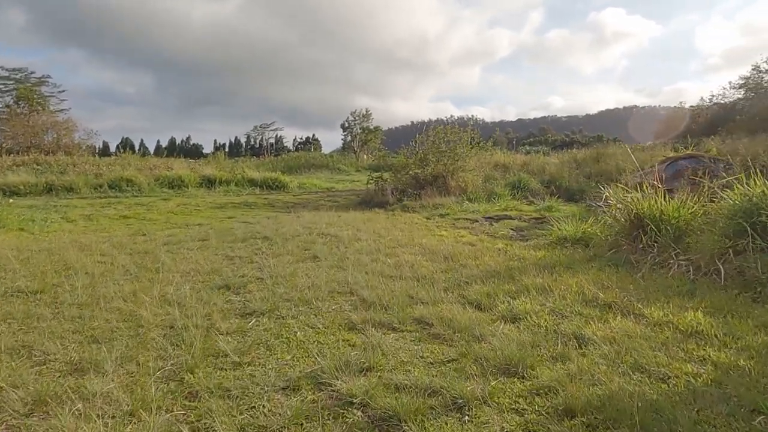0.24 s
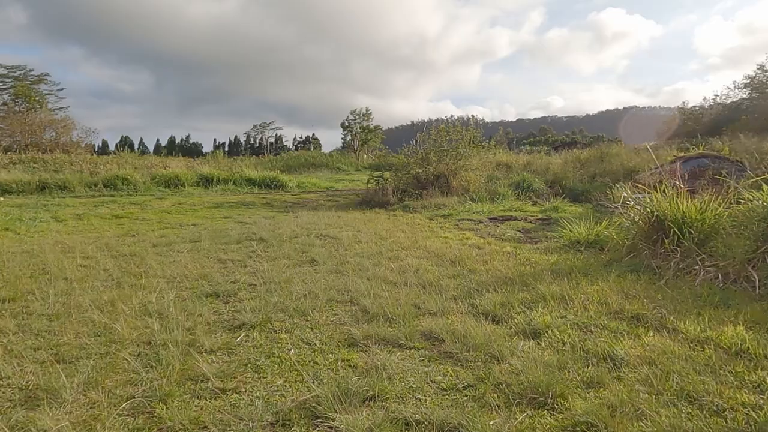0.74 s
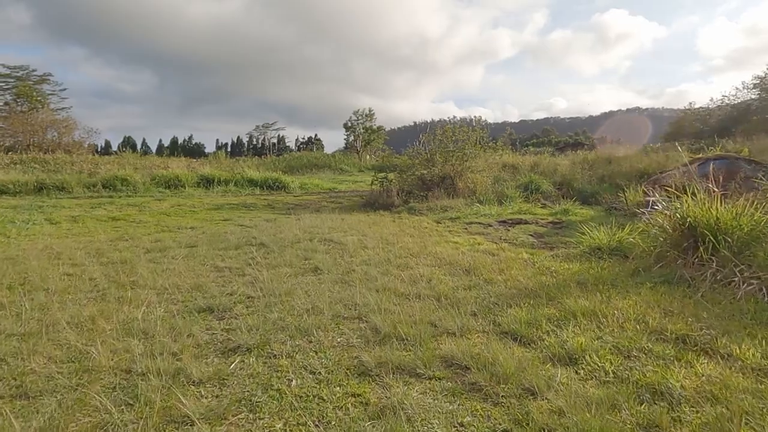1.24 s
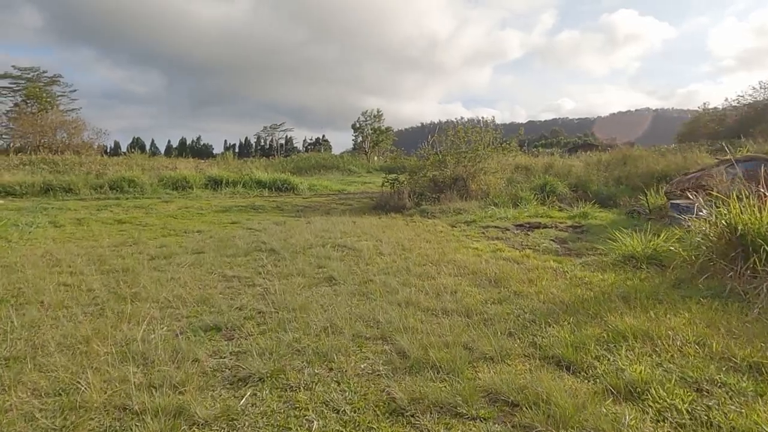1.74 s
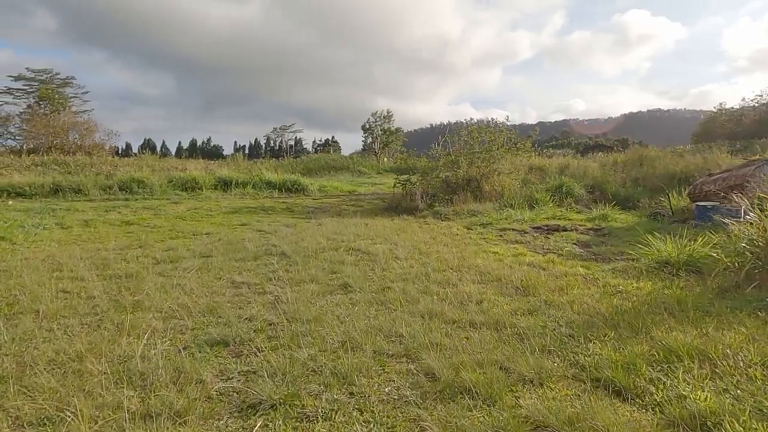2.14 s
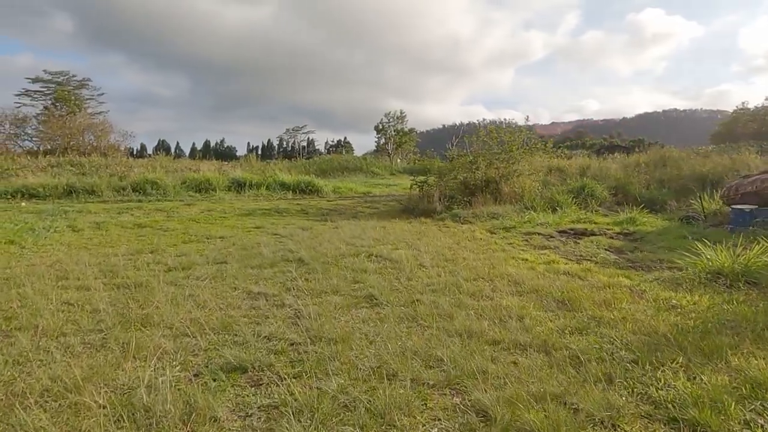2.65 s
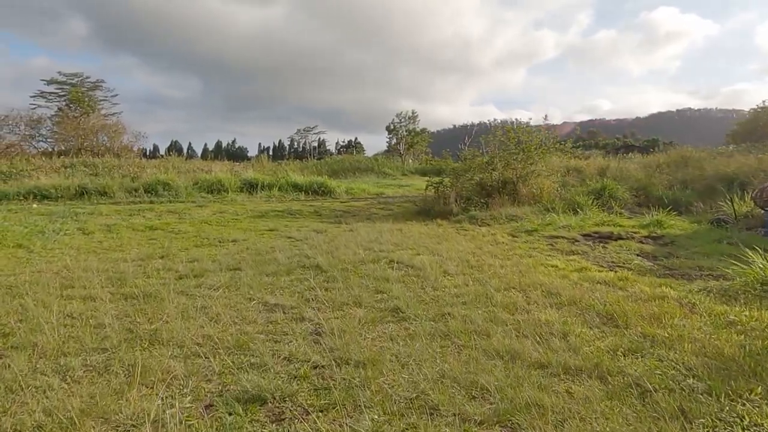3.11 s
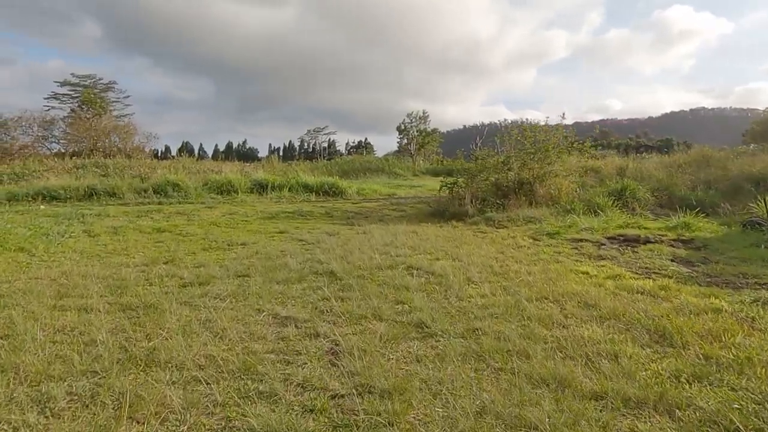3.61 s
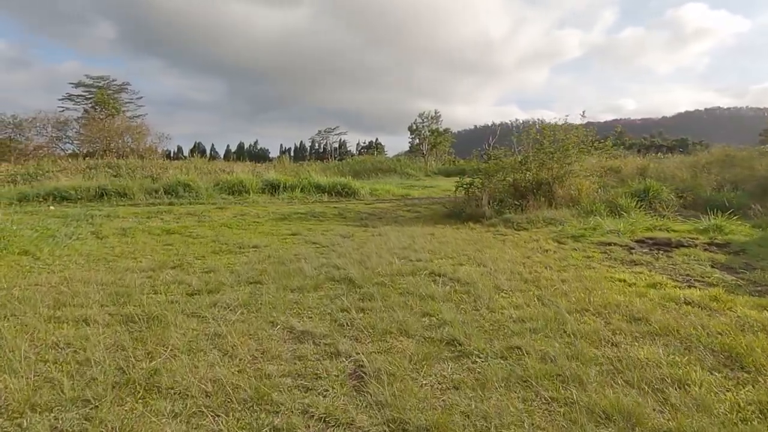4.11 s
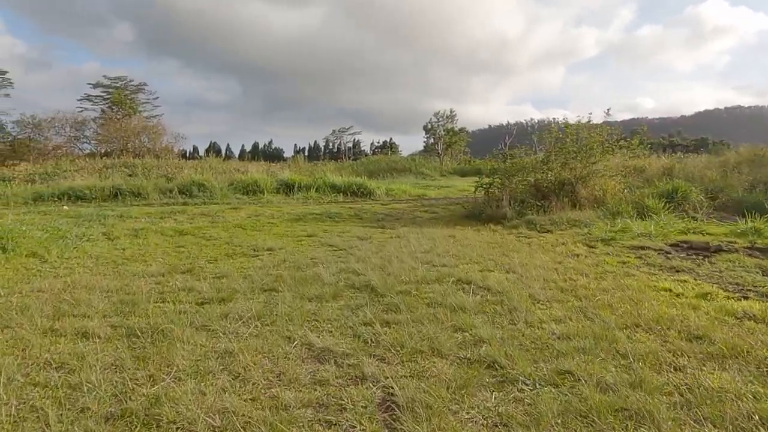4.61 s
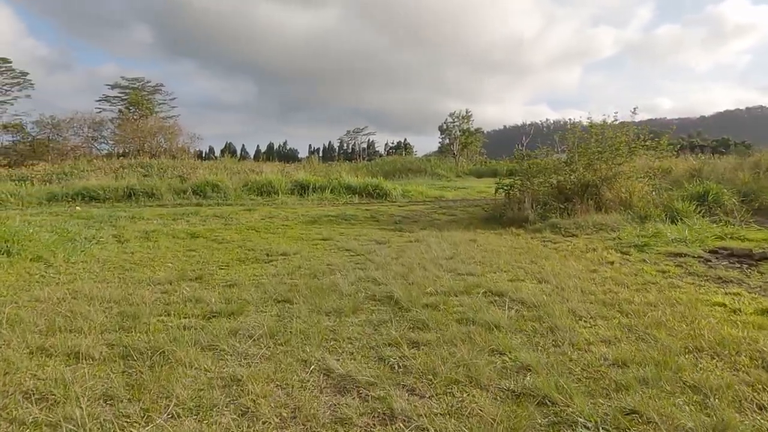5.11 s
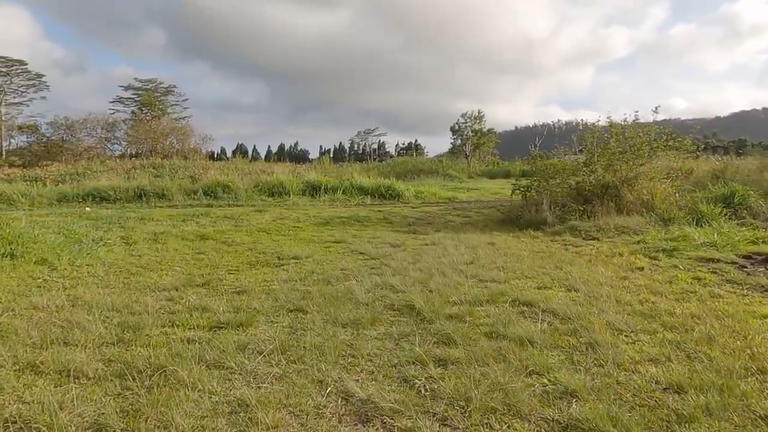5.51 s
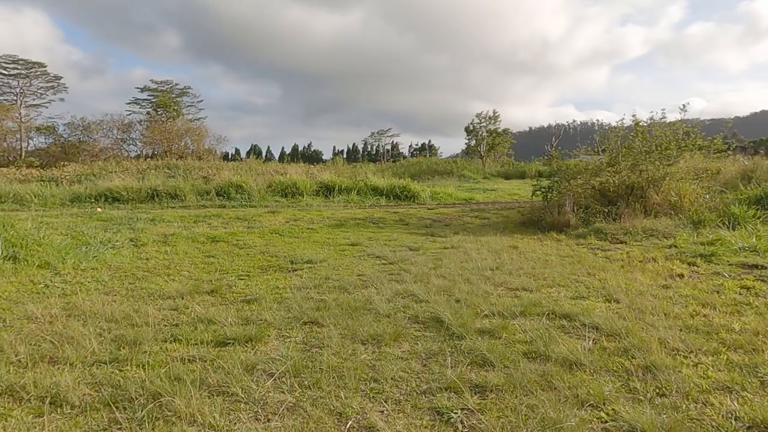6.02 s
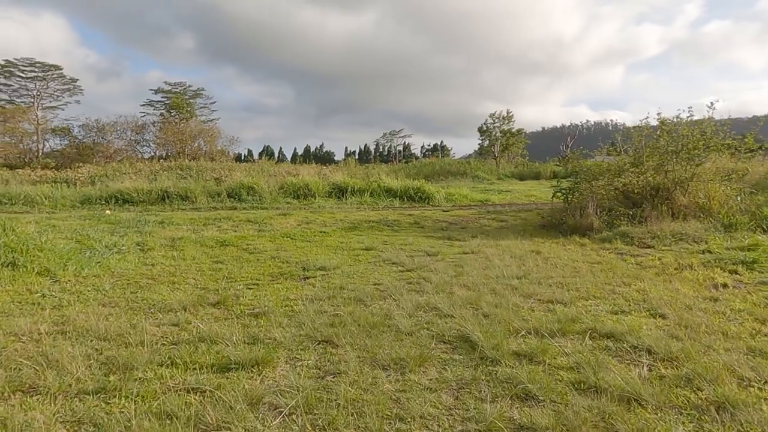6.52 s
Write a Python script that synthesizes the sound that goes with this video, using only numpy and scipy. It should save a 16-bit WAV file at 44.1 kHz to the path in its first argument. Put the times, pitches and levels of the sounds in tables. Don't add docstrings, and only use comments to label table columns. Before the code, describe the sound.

Footsteps brush crackling grass in an open field, with overlapping bird whistles and chips, ringing cricket trills and a faint distant rumble.

```python
import sys
import numpy as np
from scipy import signal
from scipy.fft import rfft, irfft, next_fast_len
from scipy.io import wavfile
from scipy.ndimage import uniform_filter1d, map_coordinates

SR = 44100
rng = np.random.default_rng(int(sys.argv[2]) if len(sys.argv) > 2 else 0)


def wav_out(sig):
    wavfile.write(sys.argv[1], SR, np.round(np.clip(np.atleast_2d(sig).T, -1, 1) * 32767).astype(np.int16))


def field_ratio(decibels):
    return 10 ** (np.asarray(decibels, dtype=float) / 20)


N = 297675
T = np.arange(N) / SR


def unit(x):
    return x / np.sqrt(np.mean(x ** 2) + 1e-20)


def along(points, hz):
    f, v = np.transpose(points)
    return np.interp(np.log(hz + 1), np.log(f + 1), v)


def wobble(knots_per_s):
    knots = rng.standard_normal(int(N * knots_per_s / SR) + 4)
    return map_coordinates(knots, [T * knots_per_s])


def filtered(x, response):
    m = next_fast_len(N + SR // 10)
    spectrum = rfft(x, m) * response(np.fft.rfftfreq(m, 1 / SR))
    return irfft(spectrum, m)[..., :N]


def panned(x, left_minus_right_db):
    return x * field_ratio([[left_minus_right_db / 2], [-left_minus_right_db / 2]])


# f/Hz, correlation [-1..1]
CORRELATION = [(60, 0.9), (200, 0.78), (600, 0.57), (1400, 0.88), (3000, 0.82), (6000, 0.9), (9000, 0.3),
               (13000, 0)]
# f/Hz, left minus right/dB
BALANCE = [(110, -6.5), (380, -5), (1290, 4.5), (4400, 1), (8120, 5), (15000, 11.5)]


def spread(pair, spectrum, band_hz):
    hz = np.fft.rfftfreq(N, 1 / SR)
    turn = np.arccos(np.clip(along(CORRELATION, hz), -1, 1)) / 2
    mid, side = rfft(pair) * field_ratio(along(spectrum, hz)) * [np.cos(turn), np.sin(turn)]
    in_band = (hz > band_hz[0]) & (hz < band_hz[1])
    band_rms = np.sqrt(2 * np.sum(abs(mid[in_band]) ** 2)) / N
    stereo = np.array([mid + side, mid - side])
    return irfft(stereo * field_ratio(along(BALANCE, hz) * [[.5], [-.5]]), N) / band_rms


def open_air(x, t60_s):
    t = T[:SR // 2]
    tail = rng.standard_normal((2, len(t))) * field_ratio(-60 * t / t60_s) * (t > .004)
    return signal.fftconvolve(x, tail / np.linalg.norm(tail[0]), axes=1)[:, :N]


# f/Hz, density/(dB per Hz)
RUMBLE_SPECTRUM = [(60, -8.5), (100, -93), (135, -0.5), (200, 1), (400, -13), (560, -14), (900, -35.5)]
# f/Hz, density/(dB per Hz)
INSECT_SPECTRUM = [(400, -18), (850, -14), (1100, -4.5), (1630, 8), (3120, 0), (5460, 2.5), (8490, -33),
                   (12300, -60), (14500, -41), (15500, -42)]
RUMBLE_DB, INSECTS_DB = -66.5, -62.5


def field():
    rumble = spread(rng.standard_normal((2, N)), RUMBLE_SPECTRUM, band_hz=(150, 450))
    rumble = rumble * field_ratio(1.5 * wobble(6))
    insects = spread(rng.standard_normal((2, N)), INSECT_SPECTRUM, band_hz=(1000, 5000))
    return field_ratio(RUMBLE_DB) * rumble + field_ratio(INSECTS_DB) * insects


# t/s, f/Hz, level/dB
FIRST_STROPHE = [
    [(0.0, 2060, -52), (0.09, 2296, -56), (0.108, 2520, -54), (0.158, 2630, -50), (0.21, 2730, -57)],
    [(0.28, 2690, -58), (0.32, 2600, -51), (0.37, 2480, -52), (0.44, 2620, -57)],
    [(0.48, 3280, -57), (0.57, 3040, -53), (0.615, 3580, -56), (0.66, 3350, -60)],
    [(0.73, 1760, -56), (0.84, 2080, -54), (0.915, 2480, -52), (0.985, 2610, -47), (1.06, 2700, -53),
     (1.09, 2700, -61), (1.17, 2600, -62)],
    [(1.195, 2580, -51), (1.25, 2350, -56), (1.29, 2370, -53), (1.33, 2550, -51), (1.35, 2540, -52)],
    [(1.4, 3230, -55), (1.44, 3180, -48), (1.5, 2940, -52), (1.55, 3190, -53), (1.62, 3450, -57),
     (1.67, 3540, -57), (1.73, 3490, -64)],
    [(1.66, 1743, -58), (1.784, 2016, -56), (1.846, 2364, -54), (1.908, 2590, -47), (1.97, 2680, -44)],
    [(2.49, 2010, -55), (2.56, 1820, -55), (2.595, 1950, -55), (2.625, 2560, -55), (2.68, 2720, -55),
     (2.74, 2750, -58)],
    [(2.805, 2510, -51), (2.85, 2700, -43), (2.9, 2800, -47), (2.945, 2880, -49), (2.99, 2880, -58)],
    [(2.84, 1990, -54), (2.89, 1780, -54), (2.92, 1890, -54), (2.945, 2490, -55), (3.0, 2710, -54),
     (3.05, 2810, -51), (3.1, 2730, -61)],
    [(3.11, 1930, -59), (3.15, 1950, -55), (3.19, 1870, -55), (3.21, 1680, -55)],
    [(3.35, 2880, -50), (3.38, 2990, -50), (3.42, 3070, -55), (3.44, 3270, -58)],
]
# t/s, f/Hz, level/dB
SECOND_STROPHE = [
    [(3.54, 3750, -53), (3.56, 3850, -54), (3.6, 3760, -59), (3.62, 3720, -53), (3.645, 3350, -51),
     (3.71, 3090, -46)],
    [(3.65, 2020, -53), (3.688, 2010, -51), (3.725, 1800, -56), (3.79, 1690, -59)],
    [(3.92, 2260, -62), (4.0, 2210, -55), (4.074, 2180, -51), (4.18, 2130, -62)],
    [(4.34, 2580, -56), (4.4, 2670, -55), (4.46, 2710, -55), (4.52, 2630, -49), (4.64, 2550, -51)],
    [(4.89, 2420, -50), (4.93, 2400, -48), (4.96, 2190, -50), (5.0, 1880, -52)],
    [(5.145, 2460, -56), (5.2, 2330, -56), (5.25, 2580, -56), (5.3, 2580, -56), (5.35, 2820, -57),
     (5.4, 2990, -57)],
    [(5.75, 2680, -52), (5.81, 2512, -49), (5.87, 2517, -52), (5.92, 2670, -56), (5.96, 2830, -58)],
    [(5.965, 2870, -50), (5.985, 3000, -51), (6.03, 2850, -54), (6.11, 2860, -58), (6.14, 2770, -61)],
    [(6.18, 3040, -57), (6.25, 2980, -58), (6.33, 3110, -59), (6.49, 3130, -58), (6.55, 3070, -52),
     (6.59, 3420, -52), (6.615, 3940, -55)],
    [(6.18, 2400, -52), (6.22, 2610, -45), (6.27, 2476, -47), (6.315, 2057, -50), (6.36, 1790, -52)],
    [(6.51, 2110, -56), (6.543, 2584, -56), (6.56, 2860, -57)],
    [(6.54, 5290, -57), (6.567, 5150, -57), (6.593, 4560, -57), (6.62, 4080, -59)],
]
WHISTLE_PAN_DB = [-5.5, -6, -6.5, -5.5, -5, -3.5, -5.5, -1, -7.5, -4, -6, -10, -6, -4, 0, -4, -4, -6, -7,
                  -8.5, -10, -5.5, -6, -5]
# start/s, length/s, first f/Hz, last f/Hz, peak/dB
BIRD_CHIPS = [(.3, .065, 4560, 3500, -58.5), (.512, .035, 4230, 3960, -57), (.99, .035, 5300, 4900, -57),
              (1.05, .065, 4120, 4090, -51), (1.12, .06, 4100, 4080, -64), (1.18, .018, 7180, 5100, -53),
              (1.196, .045, 5100, 3730, -49.5), (1.598, .062, 5050, 3800, -54),
              (1.686, .022, 3300, 3050, -57), (1.91, .035, 4300, 3600, -57),
              (2.25, .07, 2380, 2250, -60), (2.31, .04, 3900, 3200, -62), (2.405, .03, 7160, 5160, -63),
              (2.45, .03, 4300, 3850, -58), (2.68, .04, 2250, 1900, -61), (3.268, .03, 2950, 2650, -57),
              (3.565, .05, 4560, 3950, -56), (3.83, .08, 3080, 3000, -61), (4.82, .03, 3200, 2600, -59),
              (5.12, .03, 3150, 3000, -59), (5.23, .085, 3200, 2850, -58), (5.26, .04, 2400, 2200, -59),
              (5.6, .08, 2420, 2100, -58), (5.14, .055, 2640, 2580, -56),
              (6.34, .045, 4350, 3950, -54.5), (6.403, .04, 4220, 4060, -58),
              (6.508, .03, 6570, 6000, -59),
              (.28, .04, 3370, 3520, -60), (.935, .09, 3430, 3800, -54), (1.682, .025, 3850, 3960, -61),
                (1.88, .018, 3800, 4500, -58), (2.548, .09, 4200, 4400, -55),
                (2.897, .012, 6400, 7600, -56), (3.025, .035, 3400, 3650, -59),
                (3.055, .07, 3640, 3560, -61), (3.36, .04, 2550, 2800, -56),
                (3.476, .055, 2960, 4530, -53.5), (3.871, .085, 1910, 3140, -53),
                (4.255, .025, 3200, 3270, -52), (4.92, .03, 2550, 3250, -51),
                (5.031, .022, 6800, 7800, -55), (5.85, .05, 2680, 2720, -54), (6.145, .03, 4300, 4750, -58),
                (6.28, .04, 5900, 6300, -61)]
# start/s, length/s, first f/Hz, last f/Hz, peak/dB
SOLE_SQUEAKS = [
    (2.0, .065, 1150, 1090, -54),
    (5.89, .08, 990, 1130, -53),
]
CHIP_PAN_DB, SQUEAK_PAN_DB = -2, 3
CHIP_ACCENT = 0.59
START_LOSS_DB, END_LOSS_DB = 4, 6


def notes():
    paths = FIRST_STROPHE + SECOND_STROPHE
    glides = [(*np.transpose(path), pan_db) for path, pan_db in zip(paths, WHISTLE_PAN_DB)]
    short = [(*row, CHIP_PAN_DB) for row in BIRD_CHIPS]
    short += [(*row, SQUEAK_PAN_DB) for row in SOLE_SQUEAKS]
    for start, length, first_hz, last_hz, peak_db, pan_db in short:
        times = start + length * np.array([0, CHIP_ACCENT, 1])
        pitches = (first_hz, first_hz + CHIP_ACCENT * (last_hz - first_hz), last_hz)
        levels = (peak_db - START_LOSS_DB, peak_db, peak_db - END_LOSS_DB)
        glides.append((times, pitches, levels, pan_db))
    return glides


def birds():
    out, send = np.zeros((2, 2, N))
    flutter_db = 2.6 * wobble(130) + .9 * wobble(45)
    waver = .007 * wobble(200)
    for s, hz, db, pan_db in notes():
        far = min(field_ratio(.6 * (-48 - max(db))), 1.4)
        now = slice(max(round((s[0] - .002) * SR), 0), round((s[-1] + 0.0041) * SR))
        t = T[now]
        fade = np.clip(np.minimum(t - t[0], t[-1] - t) / 0.0063, 0, 1)
        pitch = uniform_filter1d(np.interp(t, s, hz), SR // 60, mode="nearest")
        pitch = pitch * (1 + far * waver[now])
        tone = np.sqrt(2) * np.sin(2 * np.pi * np.cumsum(pitch) / SR)
        level = field_ratio(np.interp(t, s, db) - 0.9 + far * flutter_db[now])
        sound = panned(tone * fade * level, pan_db)
        out[:, now] += sound
        send[:, now] += far * sound * np.minimum(3500 / pitch, 1) ** 2
    return out + field_ratio(-4) * open_air(send, t60_s=.3)


# first pulse/s, end/s, wing f/Hz, pulse rate/Hz, left minus right/dB
CRICKET_TRILLS = [
    (.005, 2.66, 5600, 41.85, 2),
    (2.6813, 3.36, 5600, 41.85, 2),
    (3.3743, 3.75, 5600, 41.85, 2),
    (4.2531, 6.0, 5610, 41.8, 3),
    (6.104, 6.8, 5830, 42.6, -3),
    (.012, 6.8, 4960, 38.3, 0),
]
CRICKET_PEAK_DB = [-59.5, -63, -56.5, -55, -57.5, -64]


def crickets():
    out = np.zeros((2, N))
    jitter = .015 * wobble(20)
    rough = field_ratio(1.5 * wobble(150))
    for (first, end, hz, rate, pan_db), db in zip(CRICKET_TRILLS, CRICKET_PEAK_DB):
        since = ((T - first) * rate + jitter + .5) % 1 / rate - .5 / rate
        stroke = np.exp(-(since / .0042) ** 2) * (T > first - .01) * (T < end)
        ring = np.sin(2 * np.pi * np.cumsum(hz * (1 - 3.0 * since)) / SR)
        out += panned(ring * stroke * rough * field_ratio(db + wobble(3.34)), pan_db)
    return out + field_ratio(-14) * open_air(out, t60_s=.1)


def rustle(patchy_db, grain_db, grains_per_s, hz):
    z = signal.stft(rng.standard_normal((2, N)), nperseg=256)[2]
    patches = uniform_filter1d(rng.standard_normal(z.shape[1:]), 5, 0)
    patches = uniform_filter1d(patches, 4, 1)
    pair = signal.istft(z * field_ratio(patchy_db * unit(patches)), nperseg=256)[1][:, :N]
    draws = rng.random((round(grains_per_s * N / SR), 4))
    when, pitch, size, side = draws.T[..., None]
    turns = hz * 5 ** (pitch - .5) * T[:SR // 160]
    rings = field_ratio(5 * size) * np.sin(2 * np.pi * turns) * field_ratio(-60 * turns / 12)
    at = (when * N).astype(int) + np.arange(turns.shape[1])
    grains = [np.bincount(at.ravel(), (rings * g).ravel(), N)[:N] for g in (1, 2 * side - 1)]
    return unit(pair) + field_ratio(grain_db) * np.array([unit(g) for g in grains])


# t/s, swish level/dB, fizz over swish/dB, reach/s
LEG_BRUSHES = [(.07, -51, -8, 0.33), (0.609, -57, -3, 0.0091), (.63, -62, -20, .07),
               (.79, -54.5, -5.5, 0.32), (1.27, -56, -27, 0.093), (1.35, -59.5, 1, 0.22),
               (1.541, -55.5, -9, 0.17), (1.952, -64, 0, 0.022), (2.021, -51, -7.5, 0.094),
               (2.186, -56, -7.5, 0.13), (2.54, -63, -36, 1), (2.64, -61, -6, 0.017),
               (2.672, -55, -7.5, 0.37), (2.878, -63, -11, .1), (3.23, -52.5, -16.5, 0.16),
               (3.316, -48.5, -11.5, 0.049), (3.48, -55.5, -9, 0.29), (3.974, -51, -8, 0.18),
               (4.179, -54.5, -10.5, 0.14), (4.52, -58, -25, 0.15), (4.622, -50, -8, 0.081),
               (4.76, -53, -2, 0.14), (4.92, -64, -4, 0.083), (5.03, -59.5, -12, 0.9),
               (5.276, -54.5, -6, 0.1), (5.45, -55, -4, 0.035), (5.468, -50, -0.5, 0.007),
               (5.485, -44, -4, .006), (5.499, -39.5, -1, 0.017), (5.519, -38.5, -4.5, 0.024),
               (5.54, -47, 0, 0.0089), (5.553, -46, -6.5, 0.019), (5.67, -62, -28, 0.3),
               (5.84, -57, -13, 0.058), (5.916, -49.5, -14.5, 0.095), (5.955, -59, -5, 0.033),
               (6.1, -57, -5.5, 0.15), (6.3, -61.5, -7, 0.36), (6.62, -60, -7, 0.13),
               (6.733, -56, -9, 0.034)]
# f/Hz, density/(dB per Hz)
SWISH_SPECTRUM = [(300, -31), (600, -15.5), (820, -16), (950, -4.5), (1300, -0.5), (1840, -1), (2200, -3.5),
                  (3030, -3), (4300, -7.5), (7000, -21.5), (9000, -62)]
# f/Hz, density/(dB per Hz)
FIZZ_SPECTRUM = [(1470, -15), (2500, -2), (2980, -2.5), (3450, -4), (4790, -3), (7510, -5.5),
                 (10400, -18.5), (12100, -14.5), (13100, -19.5), (14000, -30), (15500, -37)]
REACH_LOSS_DB, EDGE = 15, 1.47
SUDDEN, FIZZ_LOSS_DIVISOR = 1.066, 0.89
STANDING_SWISH_DB, STANDING_FIZZ_DB = -110, -78.5


def grass():
    s, db, dry_db, reach = np.transpose(LEG_BRUSHES)[..., None]
    coarse_t = T[::100]
    away = np.maximum(SUDDEN * (s - coarse_t), coarse_t - s) / reach
    lost_db = REACH_LOSS_DB * away ** EDGE

    def envelope(level_db, rest_db):
        brushes = np.linalg.norm(field_ratio(level_db), axis=0)
        return np.interp(T, coarse_t, np.hypot(brushes, field_ratio(rest_db)))

    flutter = field_ratio(.9 * wobble(35) + 1.5 * wobble(110))
    swish = rustle(patchy_db=3, grain_db=-9, grains_per_s=500, hz=1600)
    swish = spread(swish, SWISH_SPECTRUM, band_hz=(850, 1600))
    fizz = rustle(patchy_db=2.5, grain_db=-5.5, grains_per_s=900, hz=6280)
    fizz = spread(fizz, FIZZ_SPECTRUM, band_hz=(6300, 10500))
    swish_level = envelope(db - lost_db, STANDING_SWISH_DB)
    fizz_level = envelope(db + dry_db - lost_db / FIZZ_LOSS_DIVISOR, STANDING_FIZZ_DB)
    return flutter * (swish_level * swish + fizz_level * fizz)


# start/s, length/s, level/dB
CLOTH_RUBS = [(0.118, 0.074, -64.5), (.325, 0.071, -65.5), (0.797, .15, -65), (0.992, 0.24, -63),
              (1.242, 0.13, -65.5), (1.488, 0.059, -58.5), (1.965, 0.093, -64), (2.309, 0.12, -61),
              (2.442, 0.12, -62.5), (2.627, 0.13, -62), (3.163, 0.11, -63.5), (3.47, 0.079, -63),
              (3.63, 0.44, -64), (4.117, 0.088, -61.5), (4.277, 0.065, -63), (4.95, .24, -62.5),
              (5.24, 0.077, -65), (5.667, 0.12, -66), (5.842, 0.11, -63.5), (6.047, 0.17, -62.5),
              (6.244, 0.11, -57), (6.347, 0.18, -65), (6.717, 0.036, -57.5)]
# f/Hz, density/(dB per Hz)
CLOTH_SPECTRUM = [(150, -16), (240, 1), (350, 2.5), (550, -1), (800, -7), (1100, -36)]


def cloth():
    level = np.zeros(N)
    for s, length, db in CLOTH_RUBS:
        level[round(s * SR):round((s + length) * SR)] = field_ratio(db - 3.0)
    level = uniform_filter1d(level, SR // 60) * field_ratio(2.9 * wobble(40))
    rush = spread(rng.standard_normal((2, N)), CLOTH_SPECTRUM, band_hz=(280, 700))
    return panned(level * rush, 3.7)


# t/s, peak/dB, ring f/Hz
STALK_SNAPS = [(0.1715, -25.5, 1095), (1.0117, -31.5, 1110), (1.1183, -28, 1800), (1.938, -32, 1640),
               (2.3262, -31, 1740), (2.4295, -26.5, 1720), (2.5486, -35.5, 1470), (4.7195, -31.5, 824),
               (2.756, -21.5, 1340), (3.144, -31, 1580), (3.3098, -26.5, 2000), (3.319, -33, 1150),
               (3.448, -35, 1260), (3.946, -31, 1540), (4.6873, -29.5, 1850), (5.0136, -28, 1730),
               (5.0995, -31, 1770), (5.117, -28, 1660), (5.141, -32, 1680), (5.498, -18.5, 1410),
               (5.5032, -33, 1700), (5.5156, -26, 1130), (5.5218, -18, 1460), (5.539, -20.5, 1470),
               (5.547, -27, 1410), (5.756, -36, 1090), (5.814, -29.5, 1580), (5.8843, -24.5, 1570),
               (6.26, -38, 990), (6.725, -37, 1250),
               (0.1537, -30, 1310), (1.5875, -36, 1510), (1.97, -39, 1390), (2.004, -37, 1190),
                (2.185, -35, 1100), (2.2478, -39, 1460), (2.461, -37, 1680), (2.4704, -36, 1590),
                (2.5262, -36, 1440), (2.576, -42, 1720), (2.6366, -32, 1240), (2.6454, -34, 1580),
                (2.6914, -29.5, 1240), (2.8562, -32, 1310), (2.8575, -28, 623), (3.0375, -38, 2140),
                (3.2922, -31.5, 1160), (3.9793, -35, 1250), (4.164, -36, 1350), (4.292, -39.5, 1800),
                (4.798, -36, 1270), (4.8866, -35, 2410), (5.0848, -39, 1600), (5.2609, -32, 1310),
                (5.2783, -33, 2230), (5.395, -40, 1290), (5.4827, -34, 1700), (5.4934, -30, 1340),
                (5.8534, -33, 1570), (6.2824, -34, 2260), (6.6275, -38, 1300)]
# t/s, peak/dB, ring f/Hz, crack under ring/dB
DRY_TICKS = [(0.618, -32.5, 3920, -3.5), (1.344, -27, 5500, -3.5), (2.525, -28, 3270, -21),
             (2.756, -19, 2900, -17), (3.447, -24, 2730, -31), (4.69, -24, 5000, -6.5),
             (2.557, -28, 12100, -15), (4.8035, -25, 6200, -10), (4.8075, -25, 6500, -16),
             (4.752, -24, 4950, -16), (5.494, -18, 4560, 1.5), (5.581, -36, 5500, -8),
             (5.755, -27.5, 2900, -19), (5.881, -26, 3170, -13), (3.943, -19, 3170, -23),
             (4.3164, -17.5, 6400, -18), (4.72, -25, 2610, -6), (4.8005, -19.5, 5270, -3),
             (4.9305, -25, 6940, -11), (5.466, -31, 3760, 2), (5.4752, -9, 6400, -7),
             (5.564, -42, 5500, -17), (5.576, -3.5, 4700, -22), (5.5965, -37, 5000, 6)]
STALK_CRACK_DB = -30


def snaps():
    out, t = np.zeros(N + SR), T[:SR // 20]
    events = [(*row, STALK_CRACK_DB) for row in STALK_SNAPS] + DRY_TICKS
    for s, db, hz, crack_db in events:
        t60_cycles, rise_cycles = (19, .17) if hz < 2500 else (10, .8)
        ring = np.sin(2 * np.pi * hz * t) * field_ratio(-60 * t * hz / t60_cycles)
        ring = ring * (1 - np.exp(-t * hz / rise_cycles))
        crack = field_ratio(crack_db - 60 * t / 0.011) * rng.standard_normal(len(t))
        out[round(s * SR):][:len(t)] += field_ratio(db - 1.0) * (ring + crack)

    def colour(hz):
        treble = field_ratio(along(FIZZ_SPECTRUM, np.maximum(hz, 5000)) + 2)
        return treble / (1 + (700 / (hz + 1)) ** 4)

    near = panned(filtered(out[:N], colour), 3)
    return near + field_ratio(-11.5) * open_air(near, t60_s=0.061)


# t/s, peak/dB, half width/s
STEP_SWAY = [(0.23, -50.5, 0.12), (0.93, -60, 0.16), (1.58, -51, 0.086), (2.238, -51.5, 0.051),
             (2.92, -50.5, 0.06), (3.57, -47.5, 0.085), (4.35, -54, 0.033), (4.87, -55, 0.13),
             (5.54, -46.5, 0.062), (6.18, -49.5, 0.057)]
# f/Hz, density/(dB per Hz)
SWAY_SPECTRUM = [(8.8, -5), (15, 1), (35, -9.5), (76, -34.5), (110, -51), (140, -68), (240, -120)]
# t/s, peak/dB, weight (time stretch)
BODY_JOLTS = [(0.941, -41, 1.27), (5.383, -47, 1), (1.745, -45.5, 0.35), (2.858, -20, 1),
              (4.285, -32.5, 0.81), (4.292, -26, 1.2), (4.719, -31.5, 0.1), (6.285, -35.5, 0.22)]
# start f/Hz, slide/s, t60/s, level/dB, end f/Hz, delay/s
PORT_SWEEPS = [
    (650, .0005, .11, -1, 25, -.0015),
    (560, .003, .07, 2, 20, .0008),
]
RATTLE_DB, RATTLE_T60_S, RATTLE_TOP_HZ = 2, 0.05, 710


def grip():
    out, rattle = np.zeros((2, 2, N + SR))
    t = T[:SR // 5]
    for s, peak_db, weight in BODY_JOLTS:
        for port, (hz, slide, t60, port_db, end_hz, delay) in enumerate(PORT_SWEEPS):
            turns = hz * slide * np.log(1 + t / weight / slide) + end_hz * t / weight
            size = field_ratio(peak_db + port_db - 60 * t / (weight * t60))
            size = size * (1 - np.exp(-t / weight / 0.0038))
            out[port, round((s + delay) * SR):][:len(t)] -= size * np.sin(2 * np.pi * turns)
        decay = field_ratio(peak_db + RATTLE_DB - 60 * t / RATTLE_T60_S)
        rattle[:, round(s * SR):][:, :len(t)] += decay * rng.standard_normal((2, len(t)))
    out[:, :N] += filtered(rattle[:, :N], lambda hz: 1 / (1 + 1j * hz / RATTLE_TOP_HZ) ** 2)
    sway = np.full(N, field_ratio(-75))
    for s, db, width in STEP_SWAY:
        skew = np.where(T < s, .3, 1.3)
        sway += field_ratio(db) * np.exp(-((T - s) / width / skew) ** 2)
    shake = filtered(rng.standard_normal((2, N)), lambda hz: field_ratio(along(SWAY_SPECTRUM, hz)))
    shake = panned(unit(shake[0]), 4.5) + .2 * unit(shake[1]) * [[1], [-1]]
    return out[:, :N] + sway * shake


def scene():
    return field() + birds() + crickets() + grass() + cloth() + snaps() + grip()


def roll_off(x):
    return signal.sosfilt(signal.butter(12, 15680, fs=SR, output="sos"), x)


def record(dry):
    mix = filtered(dry, lambda hz: 1 / (1 + (hz / 15200) ** 70))
    return roll_off(mix)


dry = scene()
out = record(dry)
wav_out(out)
```